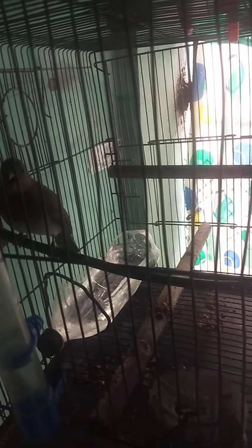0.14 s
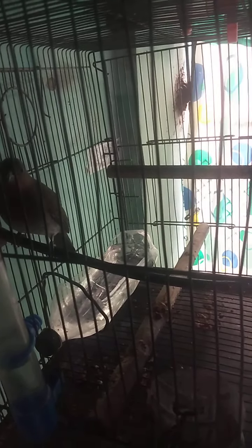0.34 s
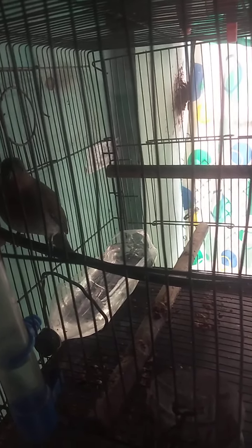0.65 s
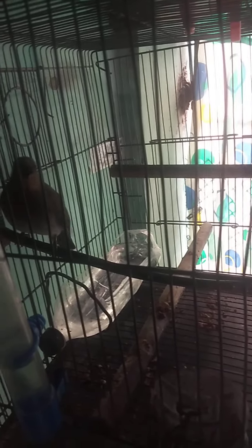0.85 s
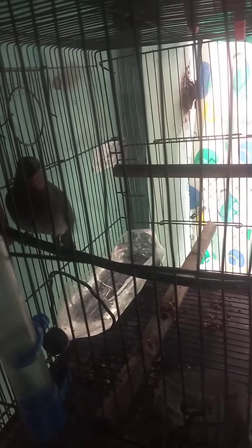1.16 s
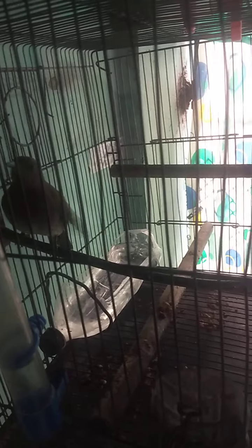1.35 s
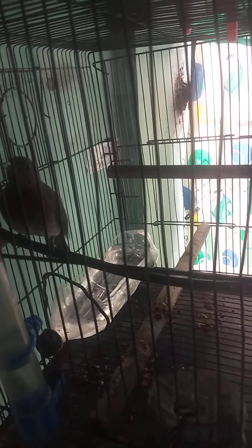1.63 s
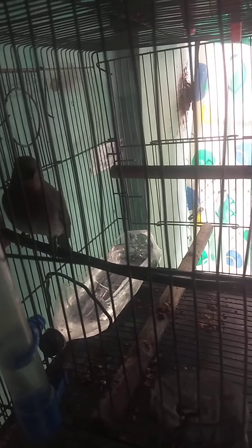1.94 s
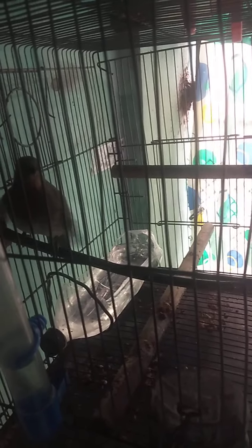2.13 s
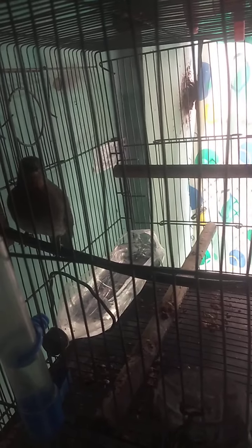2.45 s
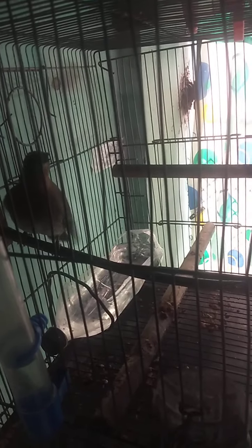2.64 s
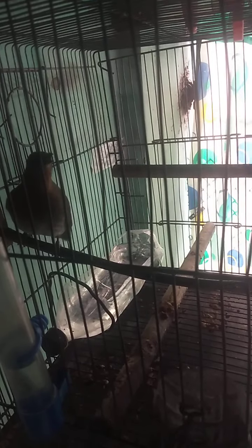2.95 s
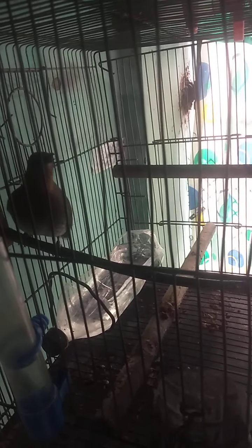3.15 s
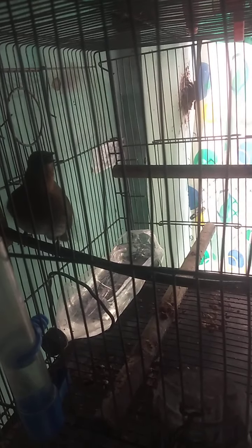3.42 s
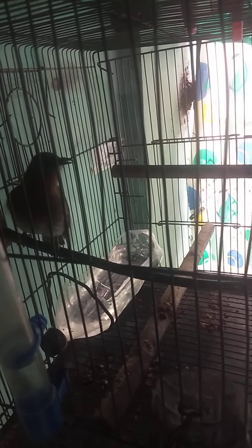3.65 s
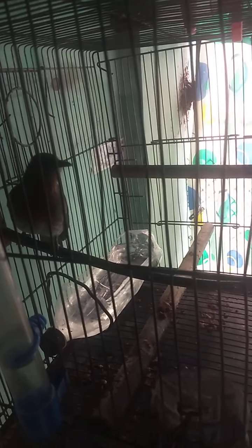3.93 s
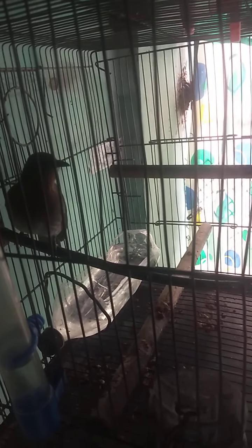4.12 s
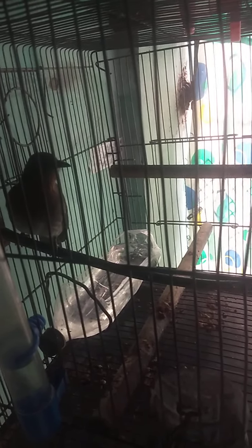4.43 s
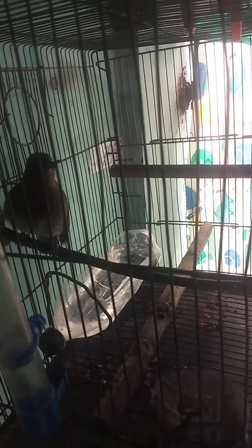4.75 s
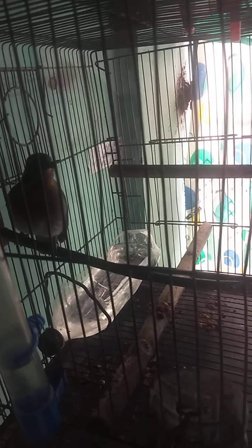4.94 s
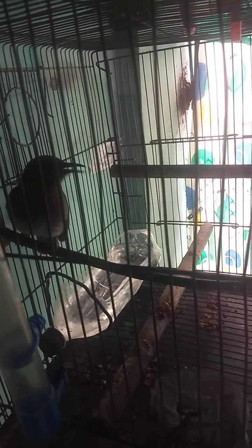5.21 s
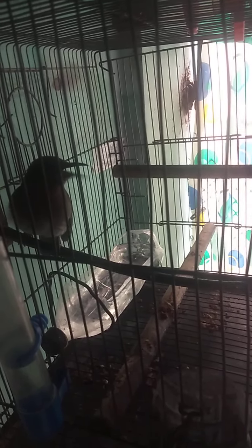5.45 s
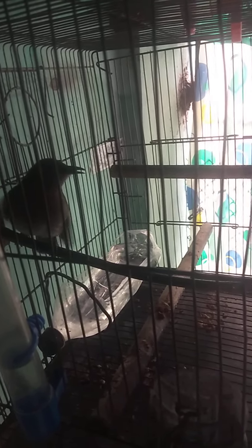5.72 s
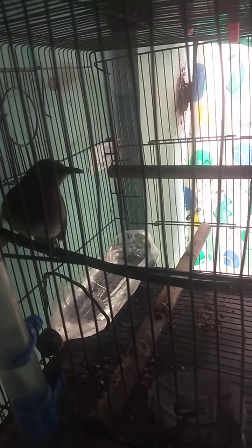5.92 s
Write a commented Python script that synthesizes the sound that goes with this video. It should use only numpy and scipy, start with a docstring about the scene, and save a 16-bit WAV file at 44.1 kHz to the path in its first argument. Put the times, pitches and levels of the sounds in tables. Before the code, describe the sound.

Harsh, whip-like bird chirps burst in small groups, broken by brief clear whistles, a buzzing warble, faint claw ticks and steady airy hush.

```python
"""Outdoor cage: a bulbul calls close by, raspy chirps in clusters, soft chucks, two short whistles, a warble.
Chirp: grating start, pitch whip up and down, sagging tail, last glide; cycle patterns and noise add rasp.
Whistles: one tone with faint overtones; in the warble a second voice beats against it.
Claws tick and feathers rustle as noise bursts, walls reflect, and a limiter ducks the coloured-noise hush
after loud calls."""
import sys
import numpy as np
from scipy import signal
from scipy.fft import rfft, irfft, next_fast_len
from scipy.io import wavfile
from scipy.ndimage import uniform_filter1d, minimum_filter1d, map_coordinates

SR = 44100
rng = np.random.default_rng(int(sys.argv[2]) if len(sys.argv) > 2 else 0)


def dump_mix(stems):
    """Bounce the given channels to the path in sys.argv[1] as a 16-bit WAV at rate SR."""
    frames = np.atleast_2d(stems).T  # one column per channel
    limited = np.clip(frames, -1, 1)  # hard clip at full scale
    pcm = np.round(limited * 32767).astype(np.int16)
    wavfile.write(sys.argv[1], SR, pcm)


N = 268128
TOP_HZ = 15850  # upper band limit

# chirps; patterns are clipped to 1-4: (start [s], grate [s], rise [s], fall [s], sag [s], lift [s],
#   grate pitch [Hz], top [Hz], trough [Hz], final pitch [Hz], relative level [dB],
#   grate rasp [0-1], grate pattern [cycles])
CHIRPS = [ (-0.1, 0.03959, 0.014964, 0.015287, 0.028253, 0.020897, 2400, 8000, 2604, 3187, -4.5, 0.27, 2),
          (0.101, 0.05221, 0.00533, 0.005791, 0.02595, 0.038956, 4578, 4894, 3472, 2806, -10, 0.81, 5.388),
          (0.839, 0.037143, 0.02602, 0.010862, 0.035766, 0.03883, 2505, 6426, 2687, 4372, -8, 1, 2),
          (1.016, 0.0118, 0.020364, 0.022556, 0.020314, 0.032065, 2689, 8400, 2679, 4107, -7.5, 0.49, 1.3),
          (1.168, 0.006925, 0.016034, 0.01212, 0.021758, 0.03275, 2537, 7900, 2803, 3537, -6, 0.56, 1.1),
          (1.75, 0.09149, 0.015128, 0.01356, 0.03631, 0.012057, 4656, 8132, 2592, 2441, -7.5, 0.89, 3.637),
          (1.969, .066, .03, 0.0083, 0.033, 0.02799, 4321, 8358, 2702, 4420, -5, 0.53, 4),
          (4.677, 0.041455, 0.004813, 0.006385, 0.03078, 0.02438, 4674, 4912, 3077, 3467, -8.5, 0.89, 3.775),
          (5.376, 0.038783, 0.023037, 0.015303, 0.02995, 0.034736, 2300, 8400, 2788, 3553, -9.5, 0.2, 1.629),
          (5.581, 0.03905, 0.023335, 0.010406, 0.030664, 0.03005, 3050, 8321, 2740, 4006, -7.5, 0.66, 2.099),
          ]
# open throat and beak, relative response: (frequency [Hz], level [dB])
OPEN_BEAK_DB = [(900, -63), (1750, -13.5), (2500, -6), (3300, -3.5), (4400, 6.5), (6000, 7), (7200, -8.5),
                (8400, -12), (9600, -14), (12000, -18), (15500, -29)]
# chaotic vibration, relative spectral density: (frequency [Hz], density [dB per Hz])
RASP_DB = [(900, -30), (1900, -9.5), (3000, 0.5), (4600, 3.5), (6000, 1), (7500, -6), (9200, -30),
           (11000, -30), (15500, -50)]
# stereo lean of chirps and chucks: (frequency [Hz], left minus right [dB])
CALL_LEAN_DB = [(1500, -0.5), (2400, 0), (4400, 0.5), (6000, -11), (8200, 14), (15000, 6.5)]
# voice phase at the two ports: (frequency [Hz], left lead [rad])
PORT_LEAD_RAD = [(1500, -1.2027), (2120, -0.4186), (2410, -4), (2600, -2.5), (3800, -3.5), (4700, -4.5),
                 (6300, -3.5), (8800, -8), (15000, -13)]
# room decay: (frequency [Hz], t60 [s])
ROOM_T60_S = [(3000, 0.23101), (15000, 0.10468)]
# outdoor hush, relative spectral density: (frequency [Hz], density [dB per Hz])
HUSH_DB = [(15, -64.5), (25, -33.5), (48, -19), (104, -7.5), (179, -9.5), (222, -7.5), (324, -11.5),
           (460, -9), (1320, -13), (5210, -16.5), (7400, -21), (8470, -21), (15800, -36.5)]
# left-right correlation of the hush: (frequency [Hz], likeness [-1 to 1])
HUSH_LIKENESS = [(60, 0.9976), (240, 0.91294), (950, 0.31), (3770, 0.2378), (15000, 0.3144)]
# claws on wire, before the common trim: (time [s], relative peak level [dB])
TICKS = [(0.518, -20.5), (0.685, -24.5), (2.349, -30), (3.975, -22.5), (4.302, -24), (4.468, -23),
         (4.966, -24), (5.982, -23.5)]
# feather flicks: (time [s], relative level [dB], length [s])
RUSTLES = [(1.534, -38, 0.02439), (1.643, -38.5, 0.0309)]
# colour of ticks and rustles: (frequency [Hz], relative level [dB])
CAGE_DB = [(1000, -1.5), (5000, 4.5), (9000, -0.5), (15000, -11)]
# soft arched notes: (start [s], length [s], top [Hz], relative level [dB], pattern [cycles])
CHUCKS = [(0.734, 0.03902, 2926, -15.5, 3.757), (5.143, 0.039466, 3194, -16, 2.2872),
          (5.269, .058, 3278, -12, 3.6)]
# nearly shut beak, relative response: (frequency [Hz], level [dB])
SHUT_BEAK_DB = [(800, -7), (1500, 1.5), (2300, -3.5), (3200, -1), (4300, 1.5), (5500, -14.5), (9000, -13.5),
                (15000, -28)]
# short whistles: (start [s], length [s], first pitch [Hz], lowest pitch [Hz], relative level [dB])
WHISTLES = [(2.578, 0.097935, 2483, 2207, -7), (2.94, 0.0799, 2546, 2382, 0)]
# whistle beak resonance near 8.7 kHz: (frequency [Hz], level [dB])
WHISTLE_BEAK_DB = [(2700, -2.5), (3100, -19.5), (4300, -20.5), (5000, -36), (7300, -33), (8300, -20.5),
                   (8950, -16.5), (9900, -28), (11500, -46)]
# stereo lean of whistles and warble: (frequency [Hz], left minus right [dB])
WHISTLE_LEAN_DB = [(2100, 3), (4300, 1.5), (8600, 10.5), (11000, 12)]
# warble pitch: (time [s], pitch [Hz])
WARBLE = [(3.173, 2333), (3.239, 2062), (3.275, 2033), (3.33, 2184), (3.393, 2197), (3.42, 2054),
          (3.456, 2149), (3.487, 2096), (3.524, 2149), (3.58, 2027), (3.654, 2154), (3.705, 2055)]
# second side of the syrinx in the warble: (start [s], length [s], offset [Hz], peak share [0-1])
BEATS = [(3.18, .115, 124.9, 0.76), (3.305, 0.10646, 119.2, 0.78), (3.487, 0.11187, 389.9, 0.86)]

# chirp
SCOOP_SHARE, SCOOP_S = 0.22, 0.014  # grate starts flat, slides up
RASP_BUILD_S = 0.008647  # rasp builds with air pressure
FALL_POWER, SAG_POWER, SAG_FROM_HZ = 2.6, 1.9, 3900  # whip hangs at top, drops, levels out
LIFT_S = 0.013  # trough-to-end glide
WHIP_RASP, TAIL_RASP = 0.2266, 0.42224
DOUBLING_HZ = (2300, 3718.8)  # tail pattern goes from 1 to 2 cycles as pitch rises
ATTACK_S, RELEASE_S = 0.008714, 0.014157
GRATE_DB, TAIL_DB, TAIL_FADE_DB_PER_S = -12.5, -2, 63  # starting levels against the whip
STRAIN_HZ, STRAIN_DB = (6146, 8400), -11  # whip weakens at high pitch
# chuck: pitch drop and level at both ends
CHUCK_ARCH_SHARE, CHUCK_EDGE_DB, CHUCK_RASP = 0.24, -10.5, 0.1478
# short whistle: dip place (share of length), rise after it (share of pitch)
TURN_AT, TURN_UP = 0.72, 0.03374
WHISTLE_ATTACK_S, WHISTLE_RELEASE_S = 0.01837, 0.017846
WARBLE_DB, WARBLE_ATTACK_S, WARBLE_RELEASE_S = -9.5, 0.02171, 0.05942


def amp(db):
    """Decibels to gain."""
    return 10 ** (np.asarray(db) / 20)


def unit(x):
    """Scale to rms 1."""
    return x / np.sqrt(np.mean(x ** 2) + 1e-20)


def along(points, hz):
    """Interpolate (Hz, value) points on a log frequency axis."""
    point_hz, values = np.transpose(points)
    return np.interp(np.log(hz + 1), np.log(point_hz + 1), values)


def add(track, start_s, x):
    """Mix x into the track, cropped at both ends."""
    start = int(start_s * SR)
    x = x[..., max(0, -start):]
    part = track[..., max(0, start):][..., :x.shape[-1]]
    part += x[..., :part.shape[-1]]


def wobble(n, knots_per_s):
    """Smooth random curve through normal random knots."""
    knots = rng.standard_normal(int(n * knots_per_s / SR) + 4)
    return map_coordinates(knots, [np.arange(n) * knots_per_s / SR])


def cycles(hz):
    """Running phase [rad] of a moving frequency."""
    return 2 * np.pi * np.cumsum(hz) / SR


def filtered(x, response):
    """Apply a frequency response by FFT."""
    n = x.shape[-1]
    m = next_fast_len(n + 8192)
    spectrum = rfft(x, m) * response(np.fft.rfftfreq(m, 1 / SR))
    return irfft(spectrum, m)[..., :n]


def noise(shape, colour_db):
    """Coloured noise of rms 1."""
    return unit(filtered(rng.standard_normal(shape), lambda hz: amp(along(colour_db, hz))))


def ramp(length_s):
    """0 to 1 over a length of time."""
    return np.linspace(0, 1, max(2, int(length_s * SR)))


def gate_db(n, attack_s, release_s):
    """Attack, hold and release of a note of n samples."""
    t = np.arange(1, n + 1) / SR
    attack = np.minimum(t / attack_s, 1)
    release = np.minimum(t[::-1] / release_s, 1)
    return 20 * np.log10(attack * release)


def chirp(row):
    """Grate, whip and tail: start time, then pitch, level, pattern and rasp curves."""
    (start_s, grate_s, rise_s, fall_s, sag_s, lift_s,
     grate_hz, top_hz, trough_hz, end_hz, db, grate_rasp, grate_pattern) = row
    t = ramp(grate_s) * grate_s
    grate = grate_hz * (1 - SCOOP_SHARE * np.exp(-t / SCOOP_S))
    rise = grate[-1] + (top_hz - grate[-1]) * np.sin(np.pi / 2 * ramp(rise_s)) ** 2
    fall = top_hz + (SAG_FROM_HZ - top_hz) * ramp(fall_s) ** FALL_POWER
    sag = trough_hz + (SAG_FROM_HZ - trough_hz) * (1 - ramp(sag_s)) ** SAG_POWER
    lift = end_hz + (trough_hz - end_hz) * np.exp(-(2 * ramp(lift_s) * lift_s / LIFT_S) ** 2)
    whip, tail = np.r_[rise, fall], np.r_[sag, lift]
    pitch_hz = np.r_[grate, whip, tail]

    grate_db = GRATE_DB * (1 - ramp(grate_s)) ** 2
    whip_db = np.interp(whip, STRAIN_HZ, [0, STRAIN_DB])
    tail_db = TAIL_DB - TAIL_FADE_DB_PER_S * np.arange(len(tail)) / SR
    level_db = db + np.r_[grate_db, whip_db, tail_db] + gate_db(len(pitch_hz), ATTACK_S, RELEASE_S)

    tail_pattern = np.interp(tail, DOUBLING_HZ, [1, 2])
    pattern = np.r_[np.full(len(t), grate_pattern), np.ones(len(whip)), tail_pattern]
    building_rasp = grate_rasp * (1 - np.exp(-t / RASP_BUILD_S))
    rasp = np.r_[building_rasp, np.full(len(whip), WHIP_RASP), np.full(len(tail), TAIL_RASP)]
    return start_s, uniform_filter1d(np.array([pitch_hz, level_db, pattern, rasp]), size=90)


def syrinx(calls, beak_db, sub_db, slope_db_per_octave, jitter, knots_per_s, flutter_db, air_db):
    """Swept tone whose cycles fall into patterns of 2, 3 or 4, putting lines between its harmonics."""
    out = np.zeros(N)
    for start_s, (pitch_hz, db, pattern, rasp) in calls:
        n = len(pitch_hz)
        rasp, pattern = np.clip(rasp, 0, 1), np.clip(pattern, 1, 4)
        phase = cycles(pitch_hz * (1 + jitter * rasp * wobble(n, knots_per_s)))
        tone, power = np.zeros(n), np.zeros(n)
        for period in range(1, 5):
            share = 1 if period == 1 else amp(sub_db) * np.clip(1 - abs(pattern - period), 0, 1)
            for k in range(1, 5 * period + 1):
                if period > 1 and k % period == 0:
                    continue  # whole harmonics belong to period 1
                multiple = k / period
                hz = multiple * pitch_hz
                colour_db = along(beak_db, hz) + slope_db_per_octave * abs(np.log2(multiple))
                gain = share * amp(colour_db) * (hz < TOP_HZ)
                gain = gain * amp(flutter_db * rasp * wobble(n, knots_per_s))
                blur = (hz / 10500) ** 3 * wobble(n, 1800)  # uneven cycles smear high partials into fizz
                tone += gain * np.sin(multiple * phase + blur + rng.uniform(0, 2 * np.pi))
                power += gain ** 2 / 2
        tone /= np.sqrt(abs(uniform_filter1d(power, size=200)) + 1e-12)
        air = amp(air_db) * rasp * noise(n, RASP_DB)  # chaotic vibration fills gaps between lines
        add(out, start_s, amp(db) * (tone + air) * signal.windows.tukey(n, .05))
    return out


def walls(x, near_db, near_t60_s, room_db):
    """Quick decaying reflections from the cage's corner, then the room's short tail."""
    hz, t, z = signal.stft(rng.standard_normal((2, SR // 3)), SR, nperseg=256)
    decay = amp(-60 * t / along(ROOM_T60_S, hz)[:, None])
    tail = signal.istft(z * decay, SR, nperseg=256)[1]
    t = np.arange(tail.shape[1]) / SR
    near = rng.standard_normal(tail.shape) * amp(-60 * t / near_t60_s) * (t > .001)
    echo = amp(near_db) * unit(near) + amp(room_db) * unit(tail * (t > .006))
    return x + signal.fftconvolve(x, echo / np.sqrt(len(t)), axes=1)[:, :N]


def hush(level_db=-33, patchy_db=1.0957):
    """Outdoor noise: near mono in the bass, diffuse in the treble."""
    def mid_side(hz):
        angle = np.arccos(np.clip(along(HUSH_LIKENESS, hz), -1, 1)) / 2
        return np.array([np.cos(angle), np.sin(angle)])

    mid, side = filtered(noise((2, N), HUSH_DB), mid_side)
    return amp(level_db + patchy_db * wobble(N, 10)) * unit(np.array([mid + side, mid - side]))


def cage(tick_trim_db=-6, tick_t60_s=0.01175):
    """Claw ticks on wire as decaying noise, feather flicks as unsteady noise bursts."""
    out, t = np.zeros(N), np.arange(2048) / SR
    for start_s, db in TICKS:
        add(out, start_s, amp(db + tick_trim_db - 60 * t / tick_t60_s) * noise(len(t), CAGE_DB))
    for start_s, db, length_s in RUSTLES:
        n = int(length_s * SR)
        level = amp(db + 2.035 * wobble(n, 311.3))
        add(out, start_s, level * signal.windows.tukey(n, .5) * noise(n, CAGE_DB))
    return out


def chuck(row):
    """Pitch and level arch together; same controls as a chirp."""
    start_s, length_s, top_hz, db, pattern = row
    edge = abs(2 * ramp(length_s) - 1) ** 2.1
    pitch_hz = top_hz * (1 - CHUCK_ARCH_SHARE * edge)
    return start_s, (pitch_hz, db + CHUCK_EDGE_DB * edge, pattern, CHUCK_RASP)


def short_whistle(row):
    """One voice slides down and turns up; the second voice is silent."""
    start_s, length_s, first_hz, low_hz, db = row
    pitch_hz = np.interp(ramp(length_s), [0, TURN_AT, 1], [first_hz, low_hz, low_hz * (1 + TURN_UP)])
    level_db = db + gate_db(len(pitch_hz), WHISTLE_ATTACK_S, WHISTLE_RELEASE_S)
    return start_s, (pitch_hz, level_db, 0, 0)


def warble(taper=0.538):
    """Held, wandering whistle in which the second voice swells and fades."""
    times_s, hz = np.transpose(WARBLE)
    t = np.arange(times_s[0], times_s[-1], 1 / SR)
    offset_hz, share = np.zeros((2, len(t)))
    for start_s, length_s, beat_hz, peak in BEATS:
        inside = (t > start_s) & (t < start_s + length_s)
        offset_hz[inside] = beat_hz
        share[inside] = peak * signal.windows.tukey(inside.sum(), taper)
    level_db = WARBLE_DB + gate_db(len(t), WARBLE_ATTACK_S, WARBLE_RELEASE_S)
    return times_s[0], (np.interp(t, times_s, hz), level_db, offset_hz, share)


def whistles(notes, waver=0.006873, shimmer_db=3, brighten=0.884, half_db=-12):
    """Two sides of the syrinx: close pitches beat slowly, distant ones buzz with sidebands."""
    out = np.zeros((2, N))
    coupling = .2
    for start_s, (pitch_hz, db, offset_hz, share) in notes:
        n = len(pitch_hz)
        phase = cycles(pitch_hz * (1 + waver * wobble(n, 500)))
        beat = np.exp(1j * cycles(offset_hz * (1 + 0.05113 * wobble(n, 137.14))))
        pair = 1 + share * (beat - coupling / beat)  # mutual pull: a mirrored sideband
        size = amp(db) * abs(pair) * np.sqrt(2 / (1 + share ** 2))
        for k in (1, 1.5, 2, 3, 3.5, 4, 4.5, 5):
            # half multiples are faint: the period only nearly doubles
            colour_db = along(WHISTLE_BEAK_DB, k * pitch_hz) + half_db * (k % 1 > 0)
            # overtones swell with effort and shimmer as the beak moves
            effort_db = brighten * (db - db.max())
            colour_db += (k > 1) * (shimmer_db * wobble(n, 38.195) + effort_db)
            lean_db = np.outer([.5, -.5], along(WHISTLE_LEAN_DB, k * pitch_hz))
            add(out, start_s, amp(colour_db + lean_db) * size * np.cos(k * phase + np.angle(pair)))
    return out


def scene():
    """The voice takes different paths through the cage to two ports; cage sounds and hush join it."""
    chirps = syrinx(map(chirp, CHIRPS), OPEN_BEAK_DB, sub_db=-0.8026, slope_db_per_octave=-0.5,
                    jitter=0.032723, knots_per_s=600, flutter_db=8, air_db=-3)
    chucks = syrinx(map(chuck, CHUCKS), SHUT_BEAK_DB, sub_db=-4.5, slope_db_per_octave=-9.5,
                    jitter=0.01757, knots_per_s=599.07, flutter_db=8, air_db=-0.5)
    calls = filtered(chirps + chucks, lambda hz: amp(np.outer([.5, -.5], along(CALL_LEAN_DB, hz))))
    calls = walls(calls, near_db=-7, near_t60_s=0.02946, room_db=-15)
    song = whistles([*map(short_whistle, WHISTLES), warble()])
    bird = calls + walls(song, near_db=-36, near_t60_s=0.0468, room_db=-12.5)
    bird = filtered(bird, lambda hz: np.exp(1j * np.outer([.5, -.5], along(PORT_LEAD_RAD, hz))))
    cage_noise = walls(np.array([cage()] * 2), near_db=6.0, near_t60_s=0.00748, room_db=7.5)
    return bird + cage_noise + hush()


def record(dry, ceiling_db=-6, release_db_per_s=21):
    """Limiter ducks both channels under loud calls, recovers slowly; then full-scale clip and band limit."""
    power = abs(uniform_filter1d(dry ** 2, size=200)).max(axis=0)
    over_db = np.maximum(10 * np.log10(power + 1e-12) - ceiling_db, 0)
    recovery_db = release_db_per_s * np.arange(N) / SR
    held_db = np.maximum.accumulate(over_db + recovery_db) - recovery_db
    gain = uniform_filter1d(minimum_filter1d(amp(-held_db), size=201), size=201)
    return filtered(np.clip(dry * gain, -1, 1), lambda hz: hz < TOP_HZ)


dry = scene()
out = record(dry)
dump_mix(out)
```